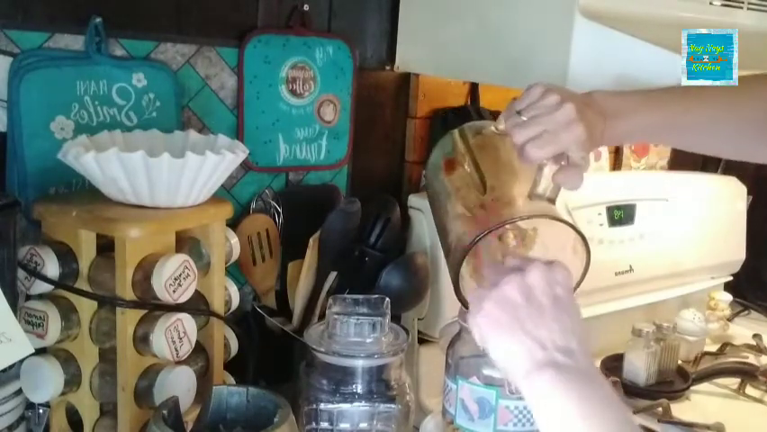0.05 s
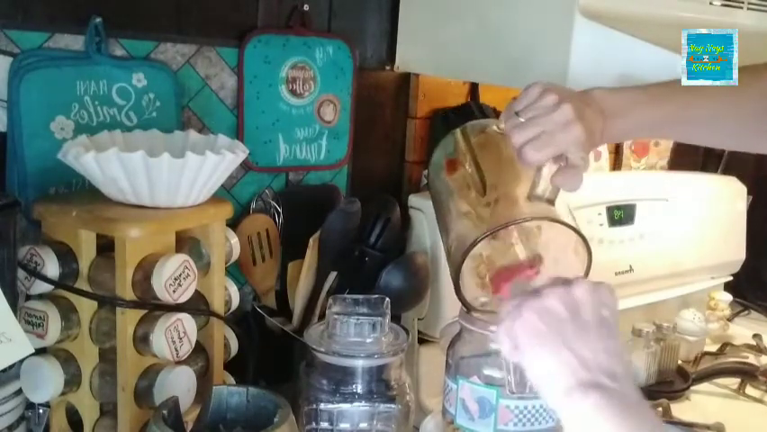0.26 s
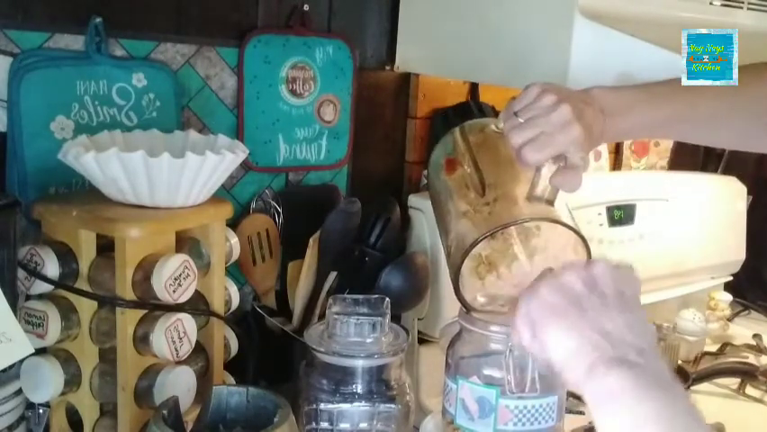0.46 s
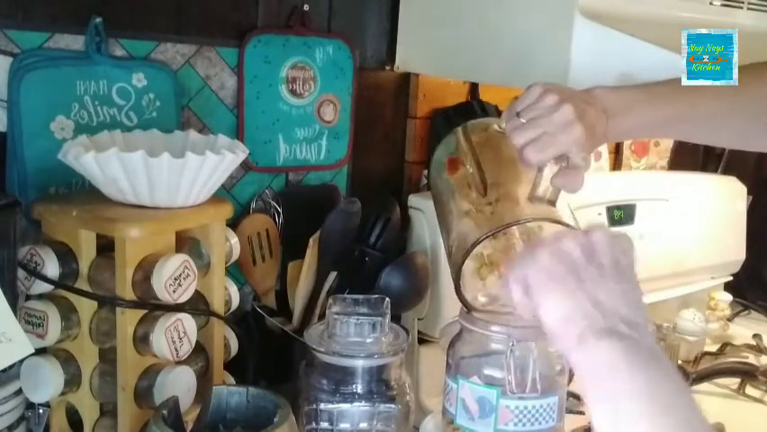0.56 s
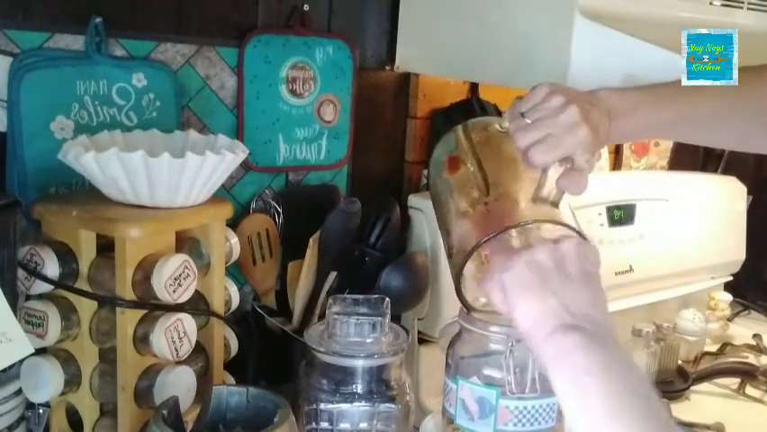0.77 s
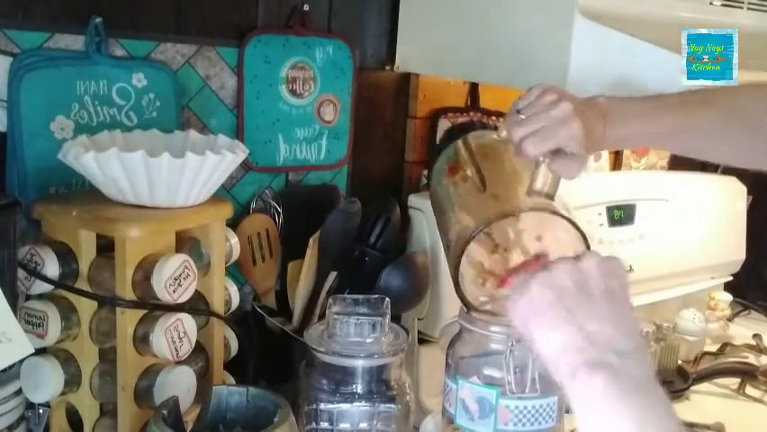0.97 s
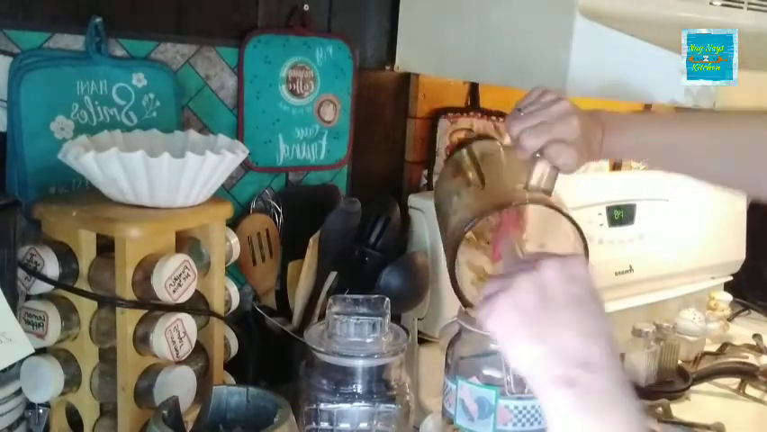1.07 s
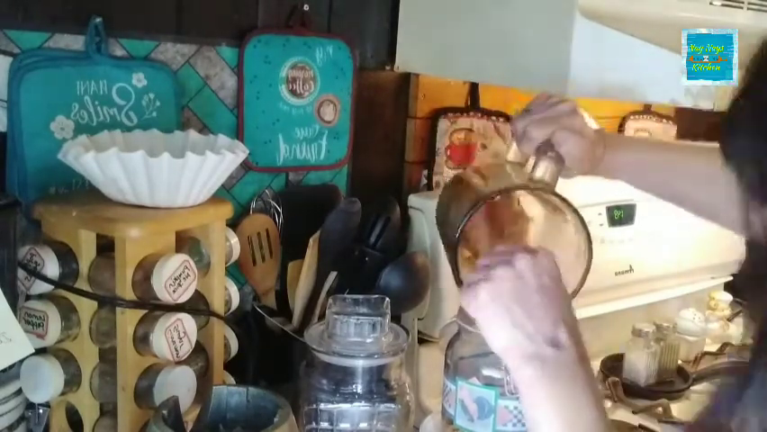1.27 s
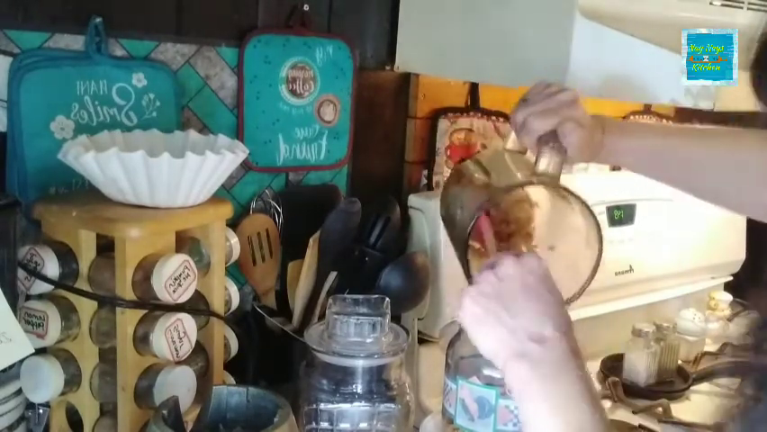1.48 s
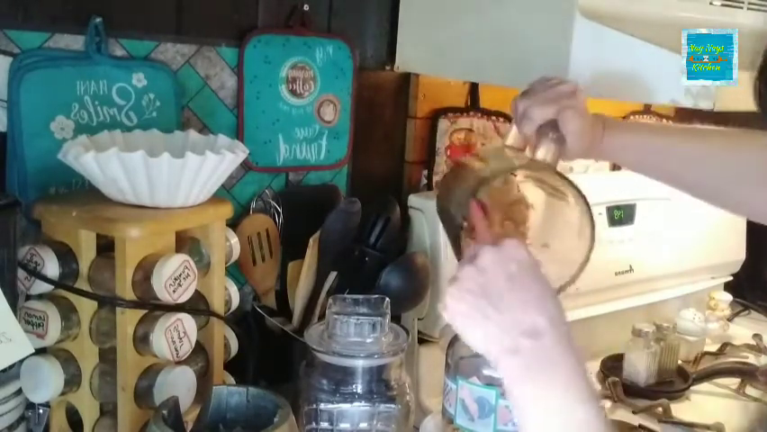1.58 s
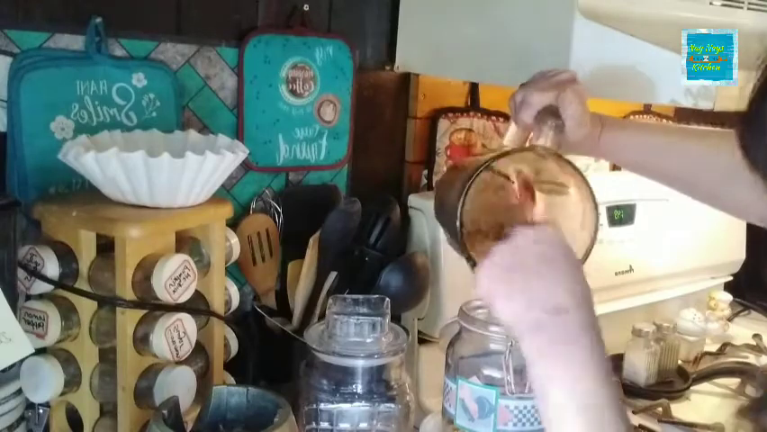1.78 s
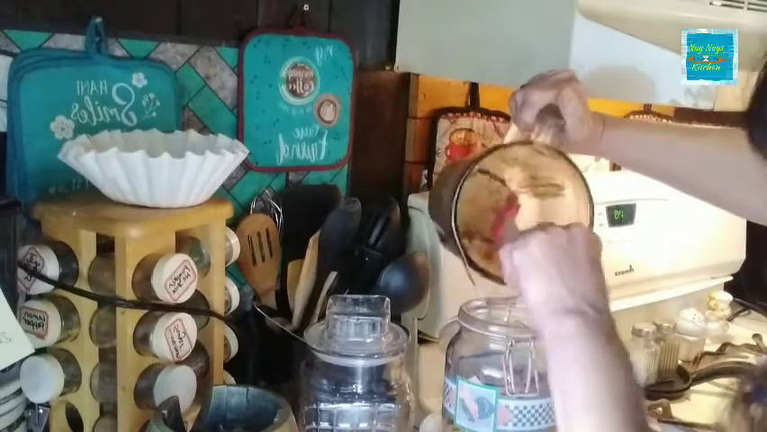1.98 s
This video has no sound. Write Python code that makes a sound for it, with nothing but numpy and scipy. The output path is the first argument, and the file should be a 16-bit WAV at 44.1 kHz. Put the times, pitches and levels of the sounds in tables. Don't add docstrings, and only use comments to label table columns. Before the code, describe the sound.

Glass jar scraped with a soft spatula, quick damped clinks and dull thuds, then a bright peel, a catching scrape and the loudest knock; quiet rubbing follows under constant fan hum, faint whistle and air noise, in stereo.

```python
import sys
import numpy as np
from scipy import signal
from scipy.fft import rfft, irfft
from scipy.io import wavfile
from scipy.ndimage import uniform_filter1d

SR = 44100
rng = np.random.default_rng(int(sys.argv[2]) if len(sys.argv) > 2 else 0)


def dump(signal):
    limited = np.clip(np.atleast_2d(signal).T, -1, 1)
    pcm = np.round(limited * 32767).astype(np.int16)
    wavfile.write(sys.argv[1], SR, pcm)


def amplitude_ratio(level_db):
    exponent = np.asarray(level_db, float) / 20
    return 10 ** exponent


N = 89478
PORT_LAG = 20
SIDE = np.array([[.5], [-.5]])


def unit(x):
    return x / np.sqrt(np.mean(x ** 2))


def colour(x, points):
    hz, db = np.array(points, float).T
    f = np.maximum(np.arange(N // 2 + 1) * SR / N, 1)
    gain = amplitude_ratio(np.interp(np.log(f), np.log(hz), db))
    return irfft(rfft(x) * gain, N)


def ring(x, hz, t60):
    pole = np.exp(2j * np.pi * hz / SR - np.log(1000) / (t60 * SR))
    return signal.lfilter([1], [1, -pole], x)


def band(x, hz, width):
    return signal.lfilter(*signal.iirpeak(hz, hz / width, SR), x)


def walk(rate):
    k = int(SR / rate)
    steps = np.repeat(rng.standard_normal(N // k + 1), k)
    return 1.4 * uniform_filter1d(uniform_filter1d(steps, k), k)[:N]


def grit(per_s, scatter_db):
    hit = rng.random(N) < per_s / SR
    sign = np.sign(rng.random(N) - .5)
    size = np.minimum(rng.exponential(size=N), 2.5)
    return unit(hit * sign * amplitude_ratio(scatter_db * size))


def swell(at, rise, fall):
    t = np.arange(N) / SR - at
    return np.exp(np.where(t < 0, t / max(rise, 1e-5), -t / max(fall, 1e-4)))


# f/Hz; decay T60/s; level/dB for blow, thud, clink, rebound, drag
BODY_HZ = [404, 442, 552, 685, 1155, 1267, 1316, 1440, 1805, 1985, 2090, 2260, 2450, 2710]
BODY_T60_S = [.19, .17, .07, .06, .08, .1, .16, .07, .05, .05, .045, .05, .04, .05]
BODY_DB = [(-2, 0, -13, -18, -8), (-2, -9, -20, -16, -16), (-8, -17, -20, -24, -14),
           (-10, -15, -20, -24, -15), (-4, -12, -12, -17, -4), (0, -17, -11, -12, -9), (-8, -18, 1, -3, 0),
           (-8, -11, -14, -15, -6), (-10, -17, -14, -12, -11), (-13, -17, -22, 0, -8),
           (-15, -15, -22, -9, -7), (-8, -18, -20, -5, -4), (-10, -18, -17, -9, -11),
           (-9, -22, -10, -14, -12)]
RIM_MODE_HZ = [3025, 3148, 3850, 4260, 4950, 5500, 6600, 6820, 7130, 10720]
RIM_MODE_T60_S = [.045, .045, .11, .03, .04, .03, .035, .05, .03, .03]
RIM_MODE_DB = [(-8, -18, -7, -11, -20), (-7, -24, -11, -14, -22), (-12, -22, -19, -14, -13),
               (-18, -27, -16, -20, -23), (-20, -26, -26, -14, -21), (-23, -31, -28, -19, -27),
               (-25, -27, -27, -21, -20), (-22, -30, -24, -27, -21), (-26, -33, -26, -27, -24),
               (-35, -33, -31, -33, -27)]
# t/s, level/dB, chatter level/dB, chatter fall/s
BLOW_HITS = [
    (1.2730, -19, -9, .007),
]
THUD_HITS = [
    (.7253, -31, -8, .005),
    (.7355, -29, -13, .006),
    (.752, -33, -15, .005),
    (1.21, -46, -8, .03),
    (1.3025, -27, -15, .005),
]
CLINK_HITS = [
    (.6644, -36, -7, .003),
    (.669, -34, -14, .008),
    (.6963, -36, -12, .006),
    (1.2785, -26, -12, .005),
    (1.303, -36, -12, .005),
]
REBOUND_HITS = [
    (1.3295, -31, -6, .004),
    (1.337, -35, -8, .006),
]
DRAG_HITS = [
    (.0005, -42, -5, .015),
    (1.1099, -27, -8, .004),
    (1.119, -36, -7, .01),
    (1.14, -36, -9, .006),
    (1.156, -40, -5, .04),
]
# f/Hz, level/dB
CRACK_SPECTRUM = [(150, -42), (400, 16), (1500, 10), (4000, 0), (8000, -22), (12000, -15), (16000, -31)]
CRACK_LEVEL_DB = [-7, -17, -8, -14, -7]


def jar():
    chatter_per_s, chatter_scatter_db = 2500, 2.5
    turn_hz, pan_db = 900, 3.0
    chatter = grit(chatter_per_s, chatter_scatter_db) * np.sqrt(chatter_per_s / SR)
    mode_hz, mode_t60 = BODY_HZ + RIM_MODE_HZ, BODY_T60_S + RIM_MODE_T60_S
    mode_db = BODY_DB + RIM_MODE_DB
    beam = rng.uniform(-1.13, 1, (len(mode_db), 2))
    out = np.zeros((2, N))
    for place, hits in enumerate((BLOW_HITS, THUD_HITS, CLINK_HITS, REBOUND_HITS, DRAG_HITS)):
        force = np.zeros(N)
        for at, db, chatter_db, fall in hits:
            force[int(at * SR)] += amplitude_ratio(db)
            force += amplitude_ratio(db + chatter_db) * swell(at, 0, fall) * chatter
        crack = amplitude_ratio(CRACK_LEVEL_DB[place]) * 10 * colour(force, CRACK_SPECTRUM)
        out += np.array([crack, np.roll(crack, PORT_LAG // 2)])
        for k, (hz, t60, db) in enumerate(zip(mode_hz, mode_t60, mode_db)):
            turn = np.pi * min(hz / turn_hz, 2) / 2 * beam[k, 0] * SIDE
            level = amplitude_ratio(db[place] + 2 * pan_db * beam[k, 1] * SIDE)
            gain = (-1) ** k * level * np.exp(1j * turn)
            out += (gain * ring(force, hz, t60)).imag
    return out


# t/s, level/dB, rise/s, fall/s
PEEL_EVENTS = [
    (0.775, -35.5, 0.00059, 0.0073),
    (0.78, -51.5, 0.0052, 0.036),
    (.115, -61.5, 0.024, 0.022),
    (1.65, -58, 0.0022, 0.0044),
    (1.765, -64.5, 0.009, 0.013),
    (1.795, -65, .004, 0.0079),
    (1.84, -63, .012, .03),
]
# f/Hz, level/dB
PEEL_SPECTRUM = [(2500, -8), (4500, 2.5), (6000, 2), (8000, 2.5), (10500, -2.5), (13000, -12),
                 (16000, -2.5)]


def peels():
    per_s, scatter_db = 9000, 2.2
    shape = sum(amplitude_ratio(db) * swell(at, rise, fall) for at, db, rise, fall in PEEL_EVENTS)
    crackle = [unit(colour(grit(per_s, scatter_db), PEEL_SPECTRUM)) for _ in range(2)]
    return shape * np.array(crackle)


def room(x):
    t60_s, level_db, gap_s, dull_hz = .19, -11, .001, 6000
    t = np.arange(SR // 2) / SR
    tail = rng.standard_normal((2, len(t))) * (t > gap_s) * amplitude_ratio(-60 * t / t60_s)
    tail = signal.lfilter(*signal.butter(1, dull_hz, fs=SR), tail)
    tail *= amplitude_ratio(level_db) / np.sqrt(np.sum(tail ** 2, 1, keepdims=True))
    return x + signal.fftconvolve(x, tail, axes=1)[:, :N]


FAN_HZ = [157, 1161.6, 1219.6, 1103.4, 1277.6, 1335.8]
# rms level/dB, wander/dB, left-right difference/dB, left phase lead/rad
FAN_TONES = [(-44, 2.58, -5.5, -0.25), (-52.5, 1.53, 9, -0.45), (-63.5, 0.5, 0, -0.87), (-70, 0.1, -5, -1),
             (-73.5, 4.5, 12, -.8), (-68, 2.5, -6, -1.5)]


def fan():
    t, out = np.arange(N) / SR, 0
    for hz, (db, wander_db, pan_db, lead) in zip(FAN_HZ, FAN_TONES):
        phase = 2 * np.pi * hz * t + 0.23 * wander_db * walk(3.6)
        level = amplitude_ratio(db + wander_db * walk(8.02) + pan_db * SIDE)
        out = out + np.sqrt(2) * level * np.sin(phase + lead * SIDE)
    return out


# f/Hz, level/dB
AIR_SPECTRUM = [(20, 2), (60, -5.5), (200, -8), (260, -14), (480, -12.5), (2400, -25.5), (7000, -45),
                (16000, -86)]
# f/Hz, width/Hz, level/dB
CABINET = [(180.2, 27, -52.5), (406, 67, -58)]


def air():
    level_db, side_db, alike_hz, flicker_db = -42, -15.5, 900, 1.5
    a, b, c = rng.standard_normal((3, N))
    alike = signal.lfilter(*signal.butter(1, alike_hz, fs=SR), a)
    apart = signal.lfilter(*signal.butter(1, alike_hz, "high", fs=SR), np.array([b, c]))
    side = amplitude_ratio(side_db) * rng.standard_normal(N)
    both = np.array([alike + side, np.roll(alike, PORT_LAG) - side])
    both = both * amplitude_ratio(flicker_db * walk(9.47))
    both = both + apart * amplitude_ratio(flicker_db * walk(8.4))
    drone = sum(amplitude_ratio(db) * unit(band(both, hz, width)) for hz, width, db in CABINET)
    return amplitude_ratio(level_db) * unit(colour(both, AIR_SPECTRUM)) + drone


def port(x, hz, q):
    w = 2 * SR * np.tan(np.pi * hz / SR)
    return signal.lfilter(*signal.bilinear([w * w], [1, w / q, w * w], SR), x)


def scene():
    return room(jar() + peels()) + air() + fan()


def top_cut(x):
    return signal.sosfilt(signal.butter(12, 16480, fs=SR, output="sos"), x)


# f/Hz, Q, level/dB
MIC_PORTS = [(7910, 3.18, 1), (10700, 2.72, -0.17)]


def record(dry):
    hiss_db, top_hz = -81.5, 15850
    wet = np.array([amplitude_ratio(db) * port(x, hz, q) for x, (hz, q, db) in zip(dry, MIC_PORTS)])
    wet = wet + amplitude_ratio(hiss_db) * rng.standard_normal(wet.shape)
    wet = signal.sosfilt(signal.ellip(10, .2, 50, top_hz, fs=SR, output="sos"), wet)
    return top_cut(wet)


dry = scene()
out = record(dry)
dump(out)
```